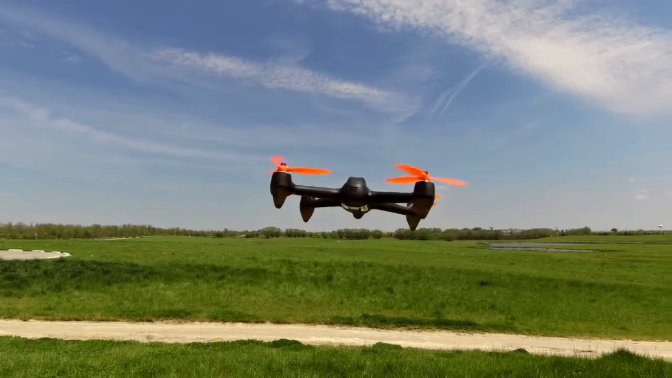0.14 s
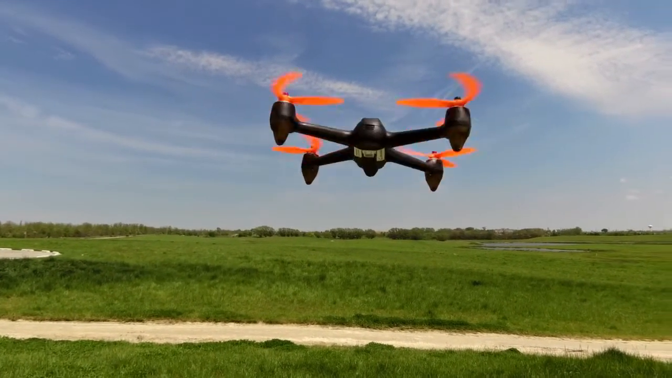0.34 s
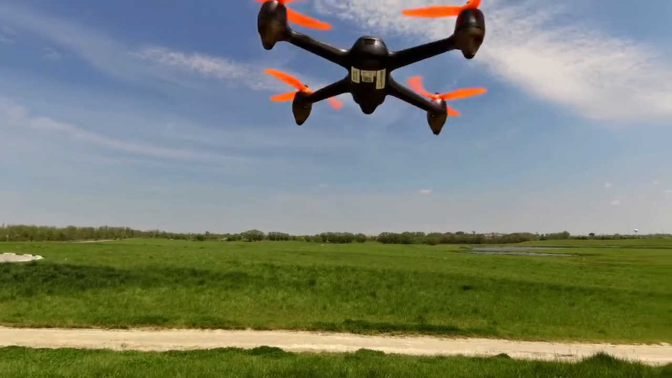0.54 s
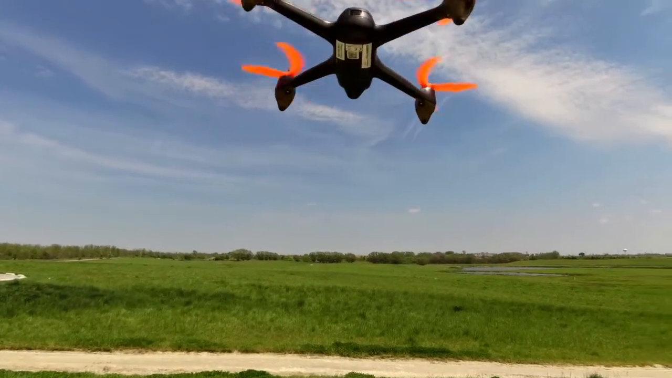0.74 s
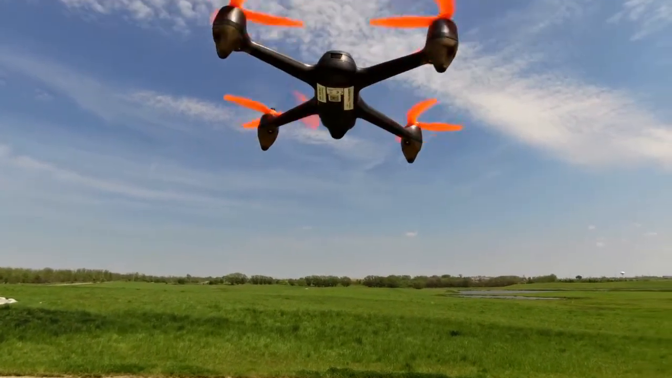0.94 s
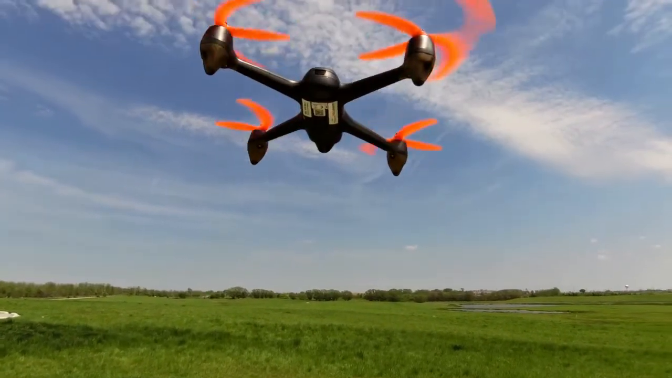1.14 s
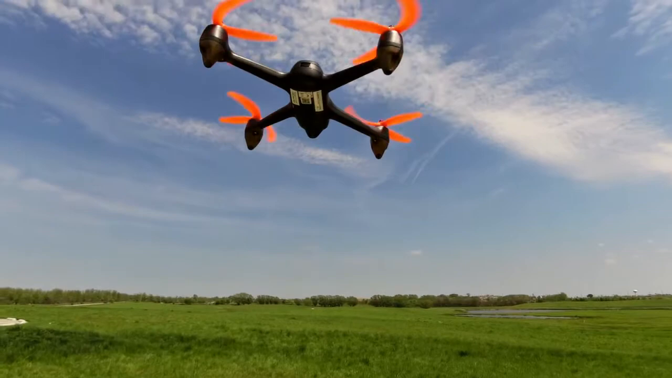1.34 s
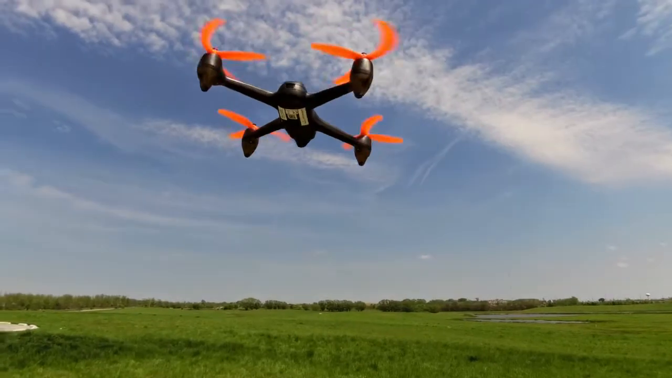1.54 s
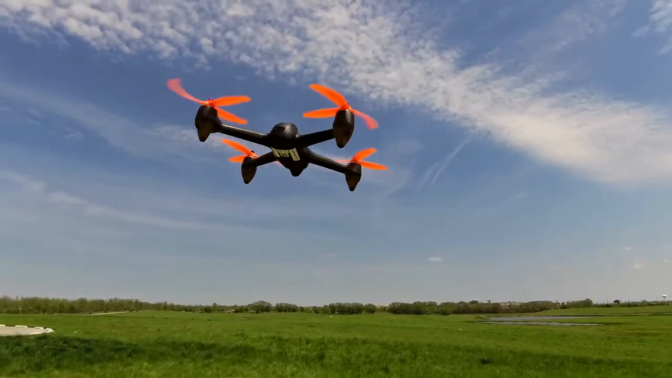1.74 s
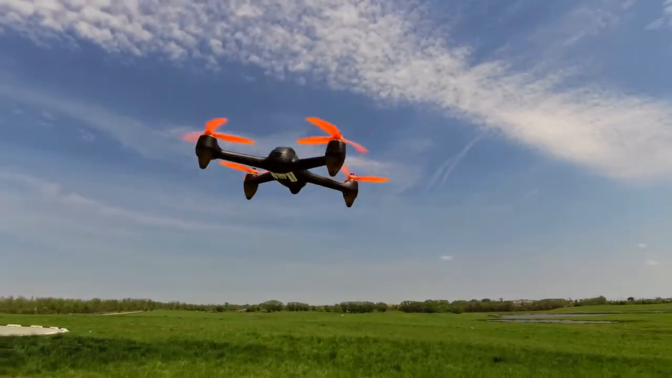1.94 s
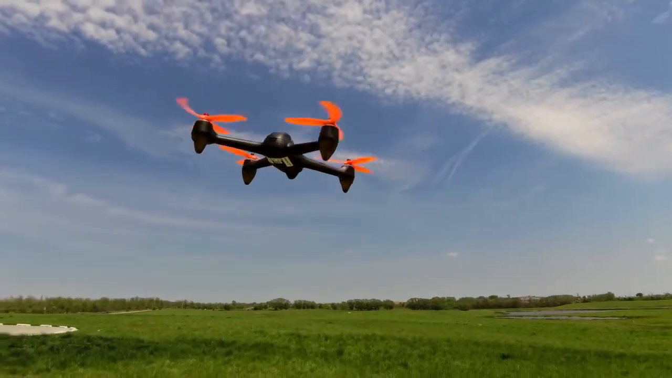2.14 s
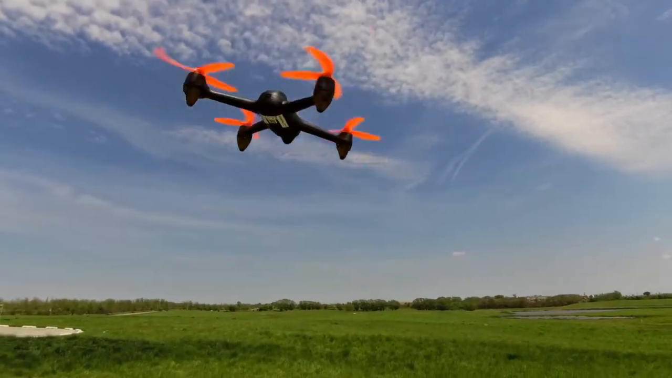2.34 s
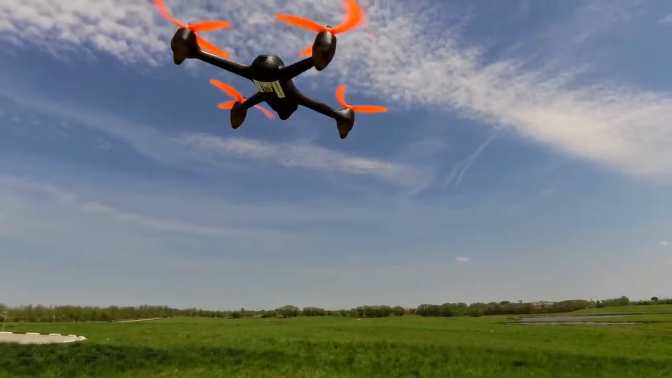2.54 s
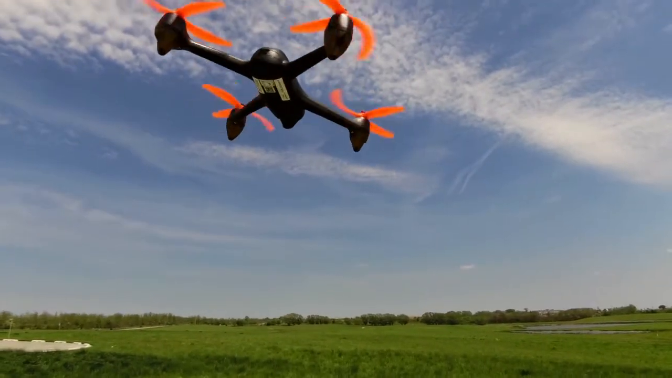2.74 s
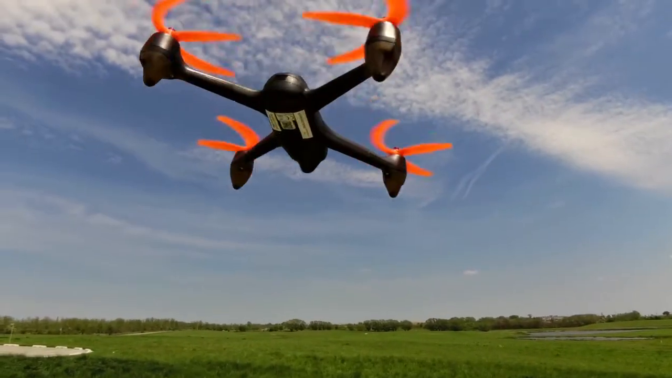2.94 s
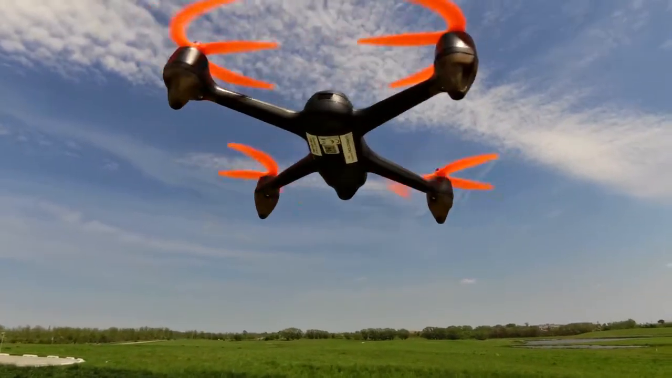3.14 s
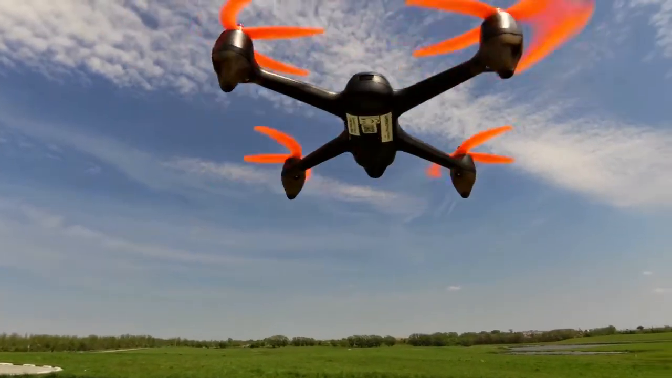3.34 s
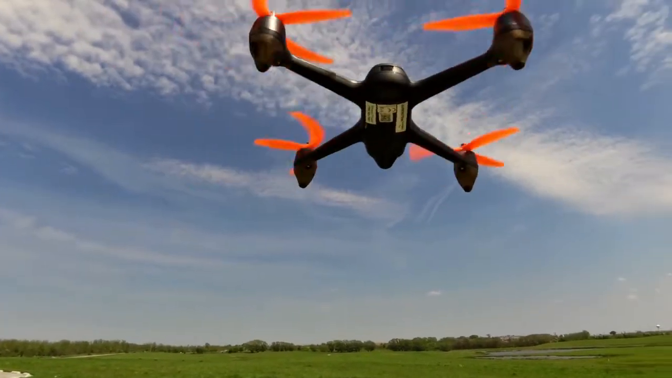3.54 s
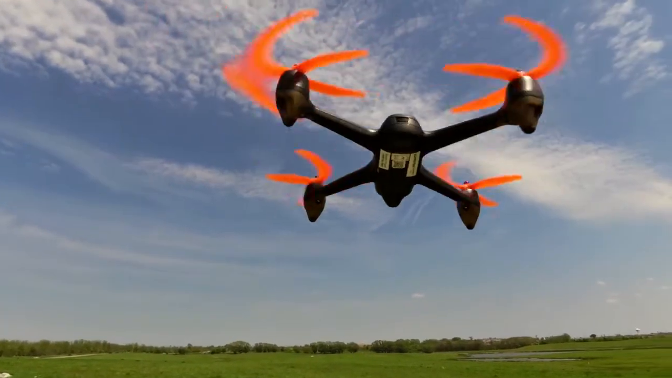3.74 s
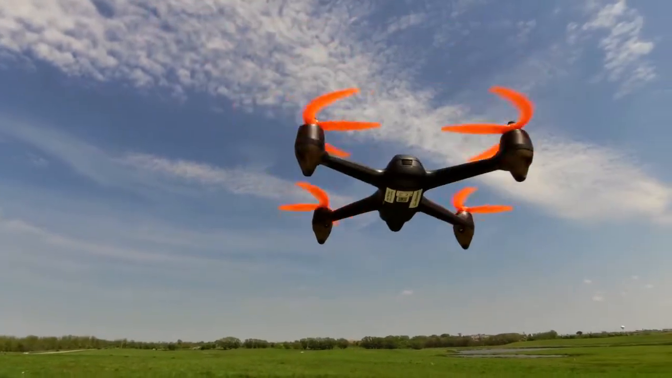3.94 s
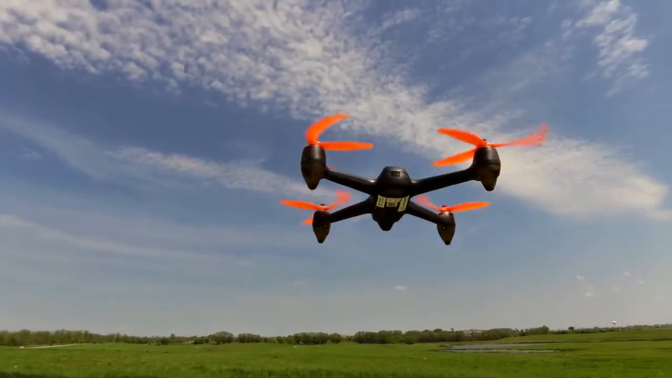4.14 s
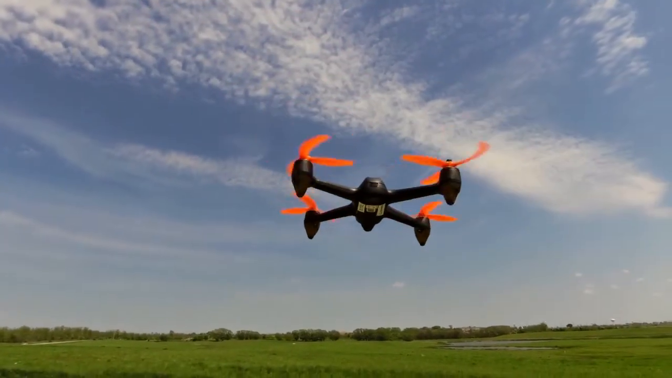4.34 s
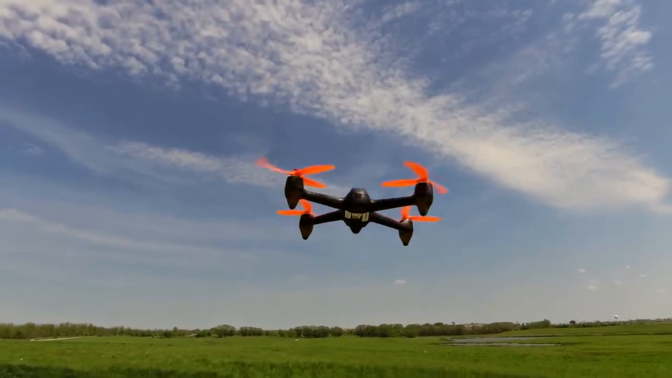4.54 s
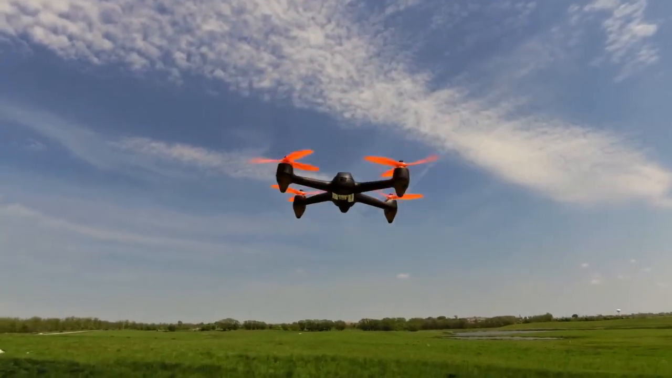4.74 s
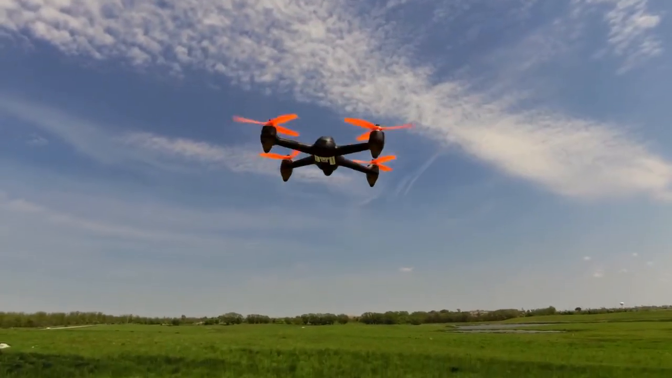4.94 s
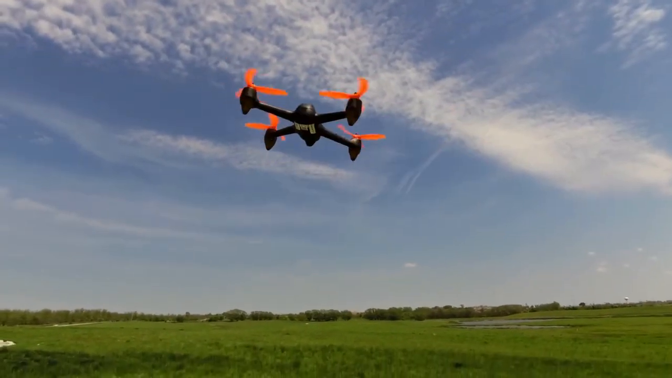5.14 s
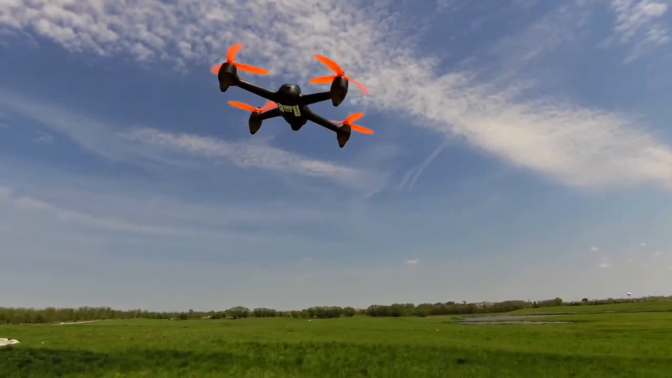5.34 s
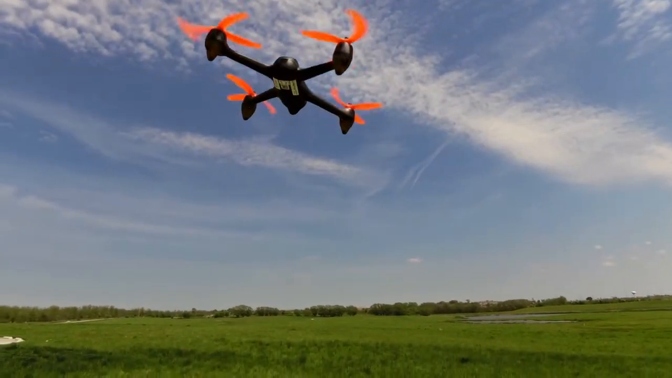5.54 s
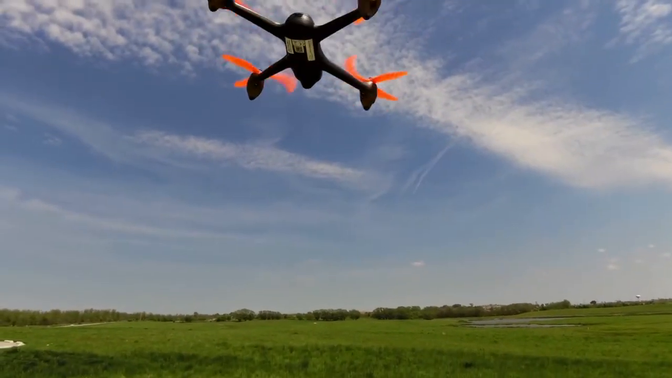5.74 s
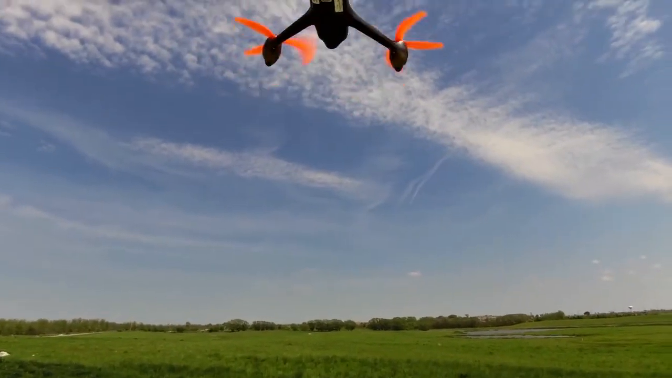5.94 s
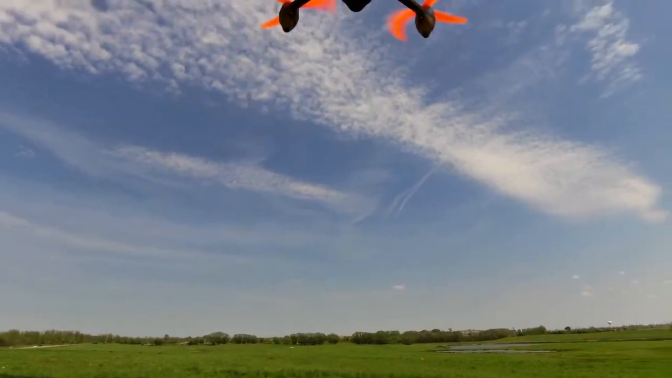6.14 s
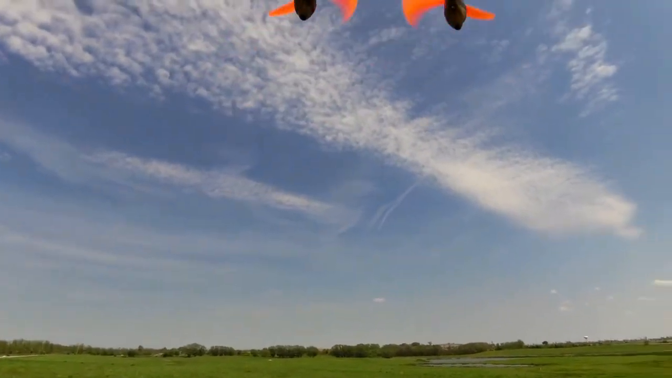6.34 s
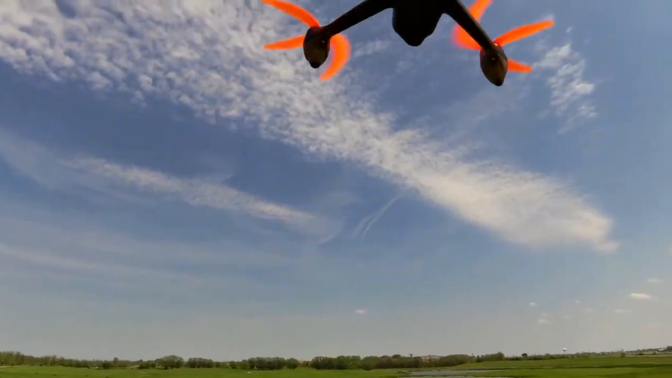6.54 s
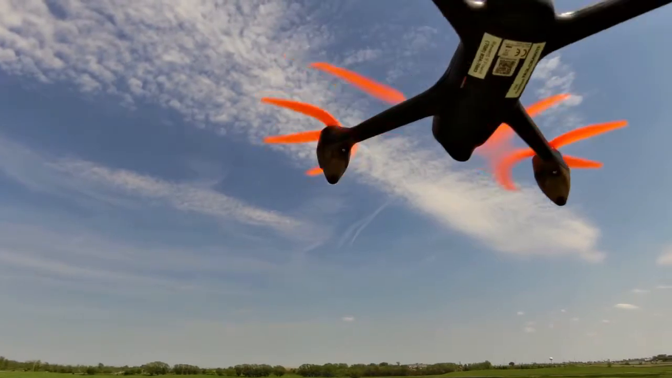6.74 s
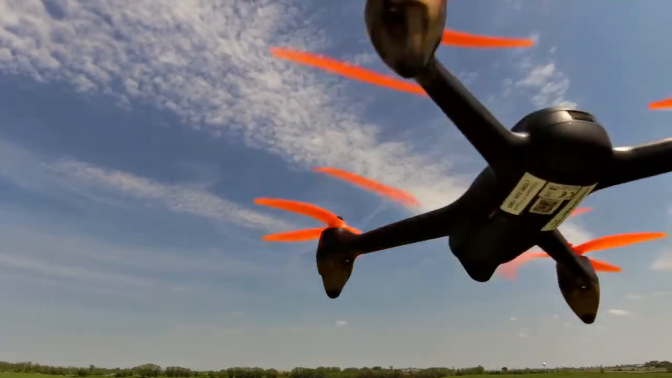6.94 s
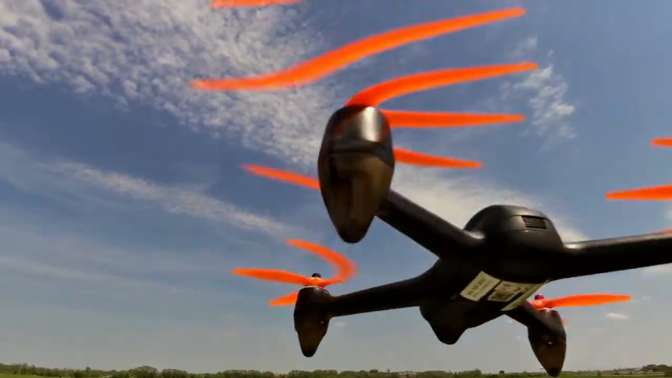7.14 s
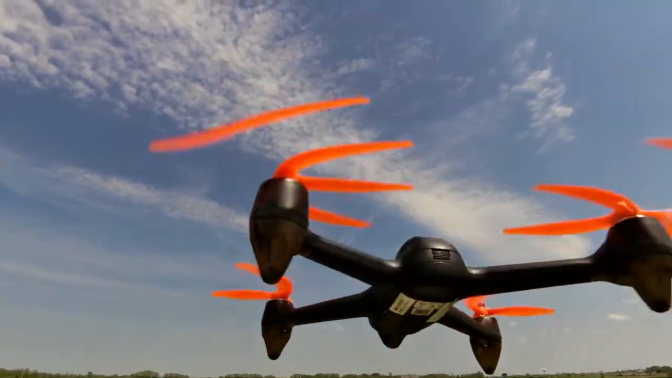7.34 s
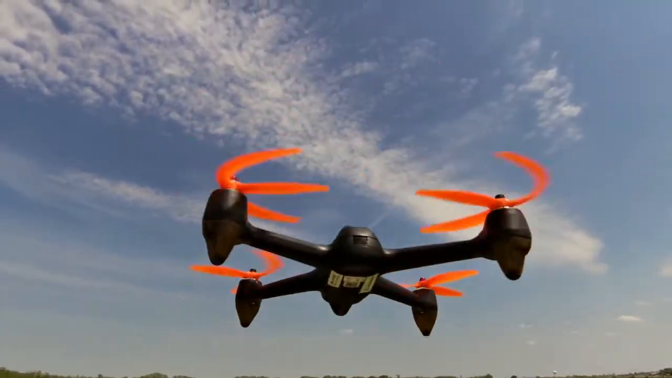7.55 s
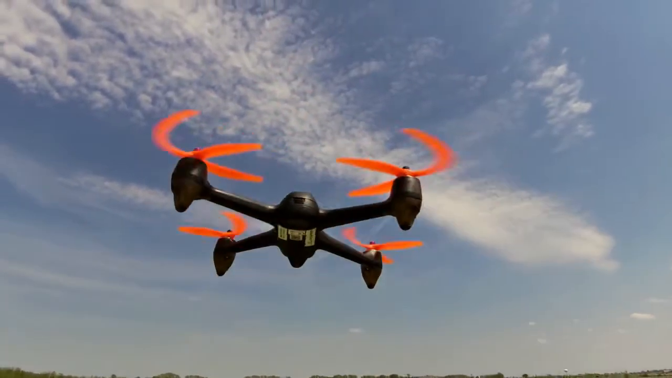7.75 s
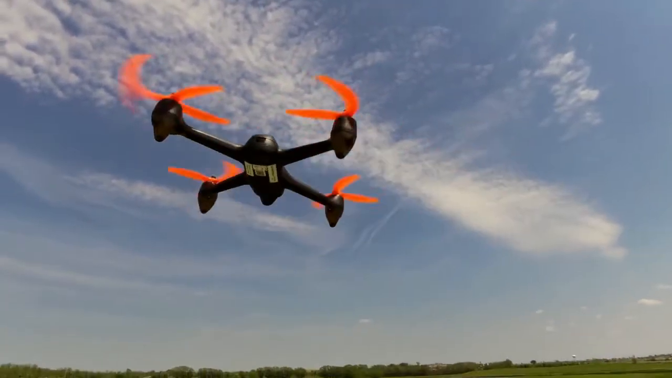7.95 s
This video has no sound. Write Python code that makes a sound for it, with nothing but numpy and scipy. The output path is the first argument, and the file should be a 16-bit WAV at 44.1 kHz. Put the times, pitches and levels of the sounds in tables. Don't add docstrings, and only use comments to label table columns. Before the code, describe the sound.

Small quadcopter drone buzzes with wavering pitch over an open breezy field, swings near and away, then sweeps low overhead, its downwash battering the microphone.

```python
import sys
import numpy as np
from scipy import signal
from scipy.fft import rfft, irfft, next_fast_len
from scipy.io import wavfile
from scipy.ndimage import uniform_filter1d

SR = 44100
rng = np.random.default_rng(int(sys.argv[2]) if len(sys.argv) > 2 else 0)


def linear_from_db(decibels):
    return 10 ** (np.asarray(decibels, float) / 20)


def output_pcm(signal):
    pcm = np.clip(np.atleast_2d(signal).T, -1, 1) * 32767
    wavfile.write(sys.argv[1], SR, np.round(pcm).astype(np.int16))


N = 352359
CRUISE_HZ = 287.2
MEAN_NEARNESS_DB = -48


def rms_one(x):
    return x / np.sqrt(np.mean(x ** 2) + 1e-20)


def in_time(rows):
    seconds, *columns = np.transpose(rows)
    return [np.interp(np.arange(N) / SR, seconds, column) for column in columns]


def bumps(rows):
    t = np.arange(0, N + 20, 20) / SR
    swells = sum(height * np.exp(-((t - s) / width) ** 2) for s, height, width in rows)
    return np.interp(np.arange(N) / SR, t, swells)


def window(start, end):
    fade = min(0.3 * (end - start), 0.05)
    return in_time([(start - fade / 2, 0), (start + fade / 2, 1), (end - fade, 1), (end + fade / 2, 0)])[0]


def drift(rate):
    r = np.exp(-40 * np.pi * rate / SR)
    noise = rng.standard_normal(N // 20 + 4002)
    slow = signal.lfilter([1], [1, -2 * r, r * r], noise)[4000:]
    return np.interp(np.arange(N) / 20, np.arange(len(slow)), rms_one(slow))


def colour(x, spectrum):
    hz, level_db = np.transpose(spectrum)
    size = next_fast_len(N)
    grid = np.fft.rfftfreq(size, 1 / SR) + 1e-3
    gain = linear_from_db(np.interp(np.log(grid), np.log(hz), level_db, left=-90, right=-90))
    return irfft(rfft(x, size) * gain, size)[:N]


def split(x, hz):
    low = signal.sosfiltfilt(signal.butter(2, hz, fs=SR, output="sos"), x)
    return low, x - low


def turning(hz, wander):
    hunted_hz = hz * (1 + wander * drift(5.09))
    return 2 * np.pi * (rng.random() + np.cumsum(hunted_hz) / SR)


# frequency in Hz, level in dB per Hz.
SELF_NOISE = [(5000, 2.5), (6700, 3), (7750, -2.5), (8800, -5.5), (10300, -9.5), (11900, -14), (12500, -17)]


def preamp_hiss():
    return linear_from_db(-81.5) * rms_one(colour(rng.standard_normal(N), SELF_NOISE))


# frequency in Hz, level in dB per Hz.
WIND_COLOUR = [(12, -47), (20, -22.5), (54, 1), (113, 1.5), (290, -5), (380, -11.5), (728, -23.5),
               (921, -30.5), (1080, -31.5), (1500, -46), (1950, -71.5), (3300, -120)]
# middle in seconds, peak level in dB, width in seconds, brightness in dB.
GUSTS = [(.08, -46, 0.27, 10), (.64, -42.5, 0.066, -15), (.8, -39.5, 0.069, 4), (1.2, -43, 0.14, -10),
         (1.42, -42.5, 0.15, 6), (1.86, -35, 0.07, 8), (2.061, -38, 0.11, -1), (2.22, -36, 0.056, -8),
         (2.522, -42, 0.071, -9), (2.741, -43, 0.032, 7), (2.88, -48, .04, -8), (3.14, -43, 0.065, 0),
         (3.5, -40.5, 0.13, -15), (3.94, -42, 0.041, 10), (4.2, -40, 0.063, 4), (4.33, -30.5, 0.029, -12),
         (4.58, -46, 0.037, 8), (4.8, -45.5, 0.15, 11.5), (5.07, -48, 0.23, 9), (5.47, -41, 0.027, 9),
         (5.7, -38.5, 0.1, -23.5), (5.94, -39.5, 0.023, -5), (6.7, -48.5, 0.31, -3)]
# middle in seconds, peak level in dB, width in seconds, brightness in dB.
WASH = [
    (6.93, -32.5, 0.034, -12),
    (7.079, -29.5, 0.043, -9),
    (7.165, -27, 0.039, 4),
    (7.26, -28, 0.04, -11),
    (7.332, -17, 0.031, 0),
    (7.432, -18.5, 0.11, 1),
    (7.542, -19.5, 0.052, 9),
    (7.651, -23, 0.12, 5.5),
    (7.804, -31, 0.017, -1.5),
    (7.889, -35.5, 0.07, -4),
]


def wind():
    lumps = GUSTS + WASH
    breeze_db, bright_db = -47.5, 4.5
    low_power = linear_from_db(breeze_db) ** 2 + bumps([(s, linear_from_db(db) ** 2, width) for s, db, width, _ in lumps])
    high_power = linear_from_db(breeze_db + bright_db) ** 2 + bumps(
        [(s, linear_from_db(db + bright) ** 2, 1.23 * width) for s, db, width, bright in lumps])
    sizes = linear_from_db(2.9 * np.minimum(rng.exponential(1, N), 4)) * rng.choice([-1, 1], N)
    arrives = rng.random(N) < 2200 / SR
    eddies = sizes * arrives * linear_from_db(1.1 * drift(23))
    low, high = split(rms_one(colour(eddies, WIND_COLOUR)), 300)
    return np.sqrt(low_power) * low + linear_from_db(-4) * np.sqrt(high_power) * high


# swing from pull to push in seconds, peak in dB, rate in Hz
# (negative Hz swings the other way round).
SLAPS = [(1.8014, -23, -200), (1.827, -25, 202), (1.8365, -19, 190), (1.8507, -24, 300), (1.8604, -22, 148),
         (2.2668, -33, -200), (2.325, -34, 420), (4.211, -27, 130), (4.3314, -24.5, 168),
         (4.7532, -29.5, -200), (5.083, -32, 200), (6.7748, -32.5, -200), (7, -22, 140),
         (7.0883, -18.5, 188), (7.1, -23, 136), (7.1539, -21, 101), (7.1618, -24, -100),
         (7.232, -20.5, -100), (7.27, -14.5, -109), (7.2875, -15.5, 155), (7.328, -13, 128),
         (7.334, -8, -130), (7.379, -15.5, -480), (7.388, -11.5, 154), (7.4473, -14, 129.5),
         (7.4636, -14, 590), (7.4658, -4.5, 190), (7.5077, -12, -110), (7.5302, -14, -278),
         (7.5461, -8, 223), (7.561, -9, 123), (7.5705, -11.5, 127), (7.5817, -13, 304),
         (7.6013, -18.5, 347), (7.6228, -16.5, -80), (7.6866, -21.5, -350), (7.702, -16, -182),
         (7.759, -20, -151), (7.7743, -21, -129), (7.8024, -12, 185), (7.857, -24, 351), (7.9109, -22, -84)]


def slaps():
    out, t = np.zeros(N), np.arange(N) / SR
    for s, peak_db, hz in SLAPS:
        near = slice(int((s - .02) * SR), int((s + .02) * SR))
        cycles = (t[near] - s) * hz
        steepness = .9 + 1.2 * linear_from_db(peak_db) + 8 * linear_from_db(4 * peak_db)
        swing = np.tanh(steepness * np.sin(2 * np.pi * cycles))
        length = .6 - .5 * linear_from_db(2 * peak_db)
        out[near] += linear_from_db(peak_db + 3.3) * swing * np.exp(-(cycles / length) ** 2)
    return out


def buffeting():
    hush = 1 - .55 * np.minimum(bumps([(s, 1, .005) for s, _, _ in SLAPS]), 1)
    return hush * wind() + slaps()


# start
# in seconds, length in seconds, multiple of the near blade rate, level in dB, throb from 0 to 1.
SNATCHES = [(0, .16, 13.9, -77, .6), (.17, .17, 14.4, -74, .8), (.37, .25, 14.05, -74, .5),
            (.1, .16, 11.5, -78, .7), (1.06, .08, 14.0, -68, .4), (1.2, .13, 14.0, -67, .5),
            (1.844, .009, 14.5, -61, .05), (1.95, .4, 13.9, -71, .35), (3.04, .22, 14.3, -64, .35),
            (5.74, .3, 14.0, -72, .5), (6.86, .18, 13.9, -55.5, .3), (6.72, .12, 14.6, -69, .6),
            (6.9, .15, 13.1, -63, .6), (7.03, .07, 13.9, -68, .2), (7.1, .07, 14.1, -57, .1),
            (7.2, .11, 14.0, -63.5, .25), (7.25, .1, 12.6, -65, .3), (7.38, .15, 12.1, -65.5, .35),
            (7.45, .12, 13.5, -69, .3), (7.89, .1, 11.95, -71, .3)]
# time in seconds, frequency in Hz.
HUNTING = [
    [(3.75, 3227), (3.85, 3565), (3.92, 3590), (4.0, 3770), (4.06, 3530), (4.13, 3712), (4.19, 3600),
     (4.26, 3680), (4.33, 3428)],
    [(4.33, 3430), (4.4, 3480), (4.45, 3320), (4.5, 3460), (4.56, 3507), (4.62, 3680), (4.69, 3630)],
    [(4.69, 3640), (4.8, 3720), (4.93, 3673), (5.07, 3570)],
    [(7.47, 3700), (7.56, 3650), (7.62, 3650), (7.66, 3580), (7.7, 3600), (7.73, 3540), (7.78, 3680),
     (7.86, 3720)],
    [(.03, 3600), (.25, 3630), (.38, 3730), (.47, 3760), (.58, 3680)],
]
HUNTING_DB = [-68, -72.5, -76, -69.5, -74.5]
HUNTING_THROB = [.12, .2, .4, .35, .55]
# start in seconds, length in seconds, start and end in Hz, level in dB.
HIGH_WHINES = [(1.0, .14, 4830, 4870, -75), (1.25, .14, 7150, 7000, -88), (1.5, .14, 6880, 6830, -90),
               (1.73, .13, 4740, 4760, -78), (1.98, .18, 7120, 7020, -89), (2.66, .26, 6800, 7120, -89),
               (4.3, .6, 6620, 6750, -92), (5.55, .25, 6450, 6520, -88), (5.8, .24, 7280, 7430, -88),
               (5.8, .5, 3530, 3470, -70.5), (6.3, .4, 3470, 3520, -70), (7.0, .3, 7520, 7480, -85),
               (7.3, .3, 6950, 6700, -86), (7.6, .3, 6760, 6620, -88)]


def whine(blade_hz):
    lines = []
    for s, length, multiple, db, throb in SNATCHES:
        lines.append((window(s, s + length), multiple * blade_hz, db, throb))
    for rows, db, throb in zip(HUNTING, HUNTING_DB, HUNTING_THROB):
        lines.append((window(rows[0][0], rows[-1][0]), in_time(rows)[0], db, throb))
    for s, length, start_hz, end_hz, db in HIGH_WHINES:
        glide_hz = in_time([(s, start_hz), (s + length, end_hz)])[0]
        lines.append((window(s, s + length), glide_hz, db - 2.5, .5))
    out, beat = np.zeros(N), turning(23.8, wander=0.23)
    for fade, hz, level_db, throb in lines:
        throbbing_hz = hz + 70 * throb * np.sin(beat)
        ragged = .6 * throb * drift(60)
        phase = turning(throbbing_hz, wander=.002 + .012 * throb) + ragged
        swell = 1 + np.clip(throb, 0, 1) * np.cos(beat)
        out += fade * swell * np.sqrt(2) * linear_from_db(level_db + 2.0 * drift(14)) * np.sin(phase)
    return out


# frequency in Hz, level in dB per Hz.
RUSH_BODY = [(120, -19.5), (200, -3.5), (400, -8), (650, -4.5), (1000, -8.5), (1440, -12.5), (1820, -23),
             (2500, -21), (2850, -28.5), (3400, -44), (4400, -51)]
# frequency in Hz, level in dB per Hz.
RUSH_TIPS = [(2300, -17), (2700, 0), (3190, -1), (3830, -3.5), (4000, 1), (4420, -1), (4680, -5.5),
             (4880, -1.5), (5570, -7), (5990, -12.5), (6400, -24), (6800, -29.5), (7300, -27.5),
             (7900, -40), (8800, -36.5), (9600, -47.5)]


def rush(phase, body_db, edge_db):
    mean_edge_db = -18
    facing_db = edge_db - mean_edge_db
    shake = linear_from_db(0.55 * drift(11))
    tips_db = -21 - 0.15 * (body_db - MEAN_NEARNESS_DB) - 0.42 * facing_db
    body = colour(rng.standard_normal(N) * (1 + 0.31 * np.cos(phase)) * linear_from_db(0.8 * drift(25)), RUSH_BODY)
    hiss = colour(rng.standard_normal(N) * (1 + .14 * np.cos(phase)) * linear_from_db(.7 * drift(30)), RUSH_TIPS)
    tips, edge = split(hiss, 3930)
    lower, upper = split(edge, 4680)
    lower_lobe = linear_from_db(mean_edge_db - 6.5 - .3 * facing_db) * rms_one(lower)
    upper_lobe = linear_from_db(edge_db - 5.5) * rms_one(upper)
    torn_air = linear_from_db(4) * rms_one(body) + linear_from_db(tips_db + 0.4) * rms_one(tips) + lower_lobe + upper_lobe
    return linear_from_db(body_db) * shake * torn_air


# start in seconds, length in seconds,
# multiple of the blade rate, level in dB against the torn air.
CLEAR_ORDERS = [(0, .12, 3, -8), (.7, .2, 3, -5), (1.1, .2, 2.85, -10), (3.04, .18, 3, -8),
                (3.3, .2, 2.2, -6), (3.28, .17, 2.8, -7), (4.24, .22, 3, -8), (5.24, .13, 3, -5),
                (5.55, .3, 3, -7), (6.14, .17, 3, -9), (7.14, .17, 3, -10), (.18, .2, 4, -11),
                (1.34, .18, 4, -9), (2.13, .33, 4, -8), (4.04, .13, 4, -11), (4.54, .22, 4, -9),
                (5.1, .2, 4, -10), (5.44, .2, 4, -7), (5.8, .2, 4, -11), (6.14, .12, 4, -11),
                (7.14, .17, 4, -12), (1.05, .16, 5, -14), (2.1, .2, 5, -14), (3.2, .12, 5, -14),
                (4.78, .23, 5, -10), (5.84, .27, 5, -12), (5.54, .12, 6, -14)]
WEAVE_RATES = [.93, .965, 1.03]


def weave(hz, phase, near_db):
    clear = sum(window(s, s + length) * linear_from_db(1.5 + db) * np.cos(k * phase) for s, length, k, db in CLEAR_ORDERS)
    flicker = np.zeros(N)
    for rate in WEAVE_RATES:
        turn = turning(hz * rate, wander=.012)
        for k in range(3, 9):
            level_db = -17 - 1.6 * (k - 3) + 5 * np.tanh(drift(2.5))
            flicker += linear_from_db(level_db) * np.cos(k * turn)
    return np.sqrt(2) * linear_from_db(near_db + 2 * drift(20)) * (clear + flicker)


# lowest speed in seconds, loss in Hz, then fall, hold and rise in seconds.
EASES = [(0.83, 68, 0.42, .04, .22), (1.159, 16.5, 0.093, 0.013, .1), (1.53, 42, 0.26, 0.3, .18),
         (2.606, 49, 0.4, 0.29, .2), (3.122, 10.5, 0.034, 0.0064, 0.056), (3.65, 66, 0.43, 0.012, 0.42),
         (4.02, 5, .1, 0.036, 0.1), (4.334, 34, .42, .08, 0.48), (5.202, 42.5, 0.39, 0.11, .48),
         (6.48, 65, .48, .08, 0.33), (6.857, 15, 0.025, 0.0011, 0.035), (6.925, -12.5, 0.04, .06, 0.048),
         (7.06, 8, 0.081, 0.012, .12)]


def speed_loss():
    loss = np.zeros(N)
    for s, hz, fall, hold, rise in EASES:
        held = s + max(hold, 0)
        ramp = in_time([(s - fall, 0), (s, 1), (held + 0.000947, 1), (held + rise, 0)])[0]
        loss += hz * ramp ** 1.5
    return uniform_filter1d(loss, size=SR // 30)


def rotor(phase, levels_db, flutter_db, blur):
    gust = blur * linear_from_db(3.5 * np.tanh(drift(1.5)))
    out = np.zeros(N)
    for k, db in levels_db:
        level = np.sqrt(2) * linear_from_db(db + flutter_db * np.sqrt(k) * drift(15))
        out += level * np.cos(k * phase + gust * (k - 1.3) ** 2 * drift(30))
    return out


# multiple of the blade rate, level in dB against a level 8 dB above the 3rd.
UPPER_ORDERS = [
    (4, -8),
    (5, -22),
    (6, -14),
]
# time in seconds, blade tone in dB, pulse sharpness as dB of 2nd order against 1st.
BLADE_LOAD = [(0, -48, -4), (.58, -49.5, 2), (.82, -41.5, 1), (.99, -42.5, -4), (1.6, -42.5, -9.5),
              (1.83, -45, -11), (2.3, -47, -2.5), (2.9, -42.5, -1.5), (3.25, -35, -7), (3.65, -38, -7.5),
              (4.3, -39.5, -7.5), (5.0, -47, -5), (5.7, -48.5, -2.5), (6.25, -49.5, -0.5),
              (6.5, -38.5, -14.5), (6.9, -32.5, -13), (7.3, -40.5, -4), (7.99, -43.5, -12.5)]
# middle in seconds, change in dB, width in seconds.
BEATS = [
    (1.06, 3, 0.067),
    (1.16, 2, 0.047),
    (1.27, 5.5, 0.037),
    (3.25, 2, 0.011),
    (4.03, -3.5, 0.057),
    (5.3, 4, 0.042),
    (6.09, 9, 0.053),
    (6.72, -13.5, 0.017),
    (6.76, 7.5, 0.017),
    (6.835, -7, 0.016),
]
# middle in seconds, change in dB, width in seconds.
ROCKING = [(.8, 2, 0.067), (1.92, -10, 0.055), (2.15, 1.5, 0.18), (2.6, -3.5, 0.35), (3.58, -4, 0.17),
           (4.38, 3.5, 0.037), (4.65, -6.5, 0.27), (5.23, -7, 0.025), (6.73, 3.5, 0.02), (6.94, 7.5, 0.064),
           (7.6, -12, 0.35)]


def blades(loss_hz, near_db):
    closer_db = near_db - MEAN_NEARNESS_DB
    load_db, sharp_db = in_time(BLADE_LOAD)
    first_db = load_db + bumps(BEATS)
    second_db = first_db + sharp_db + bumps(ROCKING)
    third_db = first_db + 0.74 * sharp_db - 5 + 0.18 * closer_db + 2.3 * drift(8)
    first = [(1, first_db)]
    upper = [(2, second_db), (3, third_db - 8.0)] + [(k, third_db + db) for k, db in UPPER_ORDERS]
    near_hz = CRUISE_HZ - loss_hz
    phase = turning(near_hz, wander=0.003937)
    near = rotor(phase, first + upper, flutter_db=.9, blur=.24)
    twin_orders = first + [(k, db + 4 + (k > 2) * 1) for k, db in upper]
    twin = linear_from_db(-8) * rotor(turning(near_hz * .97, wander=.02), twin_orders, flutter_db=1.2, blur=.2)
    far_hz = 250.2 - 0.58 * loss_hz - 3 * closer_db
    far_db = -11 - 0.86 * closer_db
    far_orders = first + [(k, db + 1.0) for k, db in upper]
    far = linear_from_db(far_db) * rotor(turning(far_hz, wander=.015), far_orders, flutter_db=-0.5, blur=0.22)
    return near + twin + far, phase


# time in seconds, nearness as dB of torn air, trailing-edge hiss in dB against it
FLIGHT = [(0, -56.5, -23), (.6, -50, -12), (.85, -49, -16), (1.1, -43.5, -16), (1.6, -49.5, -18),
          (2.76, -51, -16.5), (3.2, -41.5, -15), (3.69, -46.5, -16), (4.05, -45.5, -13.5),
          (4.5, -51.5, -20), (5.34, -54, -16), (5.92, -47.5, -16.5), (6.22, -47, -22.5), (6.5, -47, -19),
          (6.87, -38.5, -15.5), (7.23, -41, -10), (7.6, -44, -17), (7.99, -49.5, -13.5)]


def scene():
    loss_hz = speed_loss()
    blade_hz = CRUISE_HZ - loss_hz
    near_db, edge_db = in_time(FLIGHT)
    hum, phase = blades(loss_hz, near_db)
    air = buffeting() + rush(phase, near_db, edge_db)
    return (air + whine(blade_hz) + weave(blade_hz, phase, near_db) + hum)[None]


def band_limit(x):
    return signal.sosfilt(signal.butter(12, 12400, fs=SR, output="sos"), x)


def record(dry):
    rounded = dry / (1 + (dry / .76) ** 10) ** (1 / 10)
    return band_limit(rounded + preamp_hiss())


dry = scene()
out = record(dry)
output_pcm(out)
```